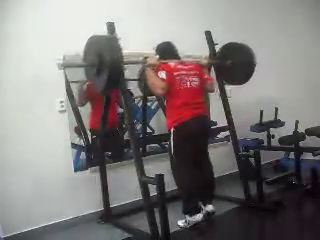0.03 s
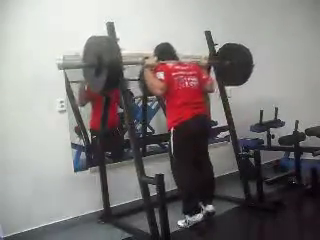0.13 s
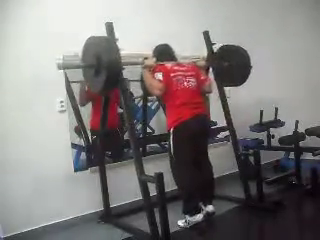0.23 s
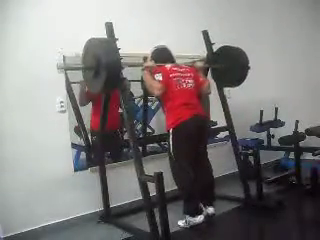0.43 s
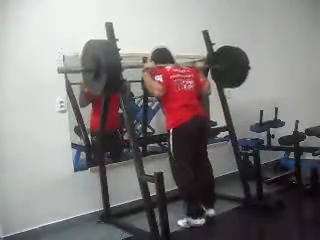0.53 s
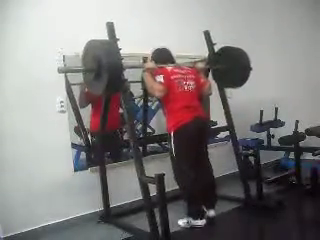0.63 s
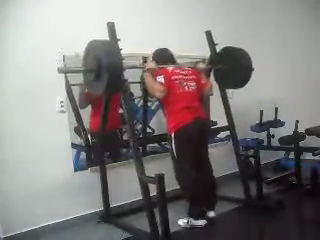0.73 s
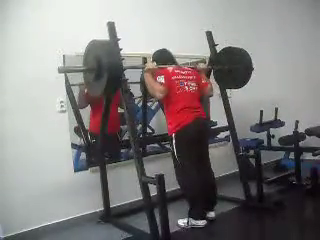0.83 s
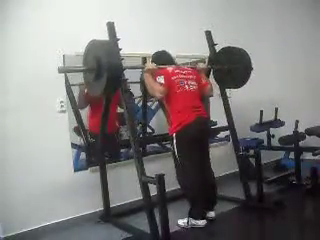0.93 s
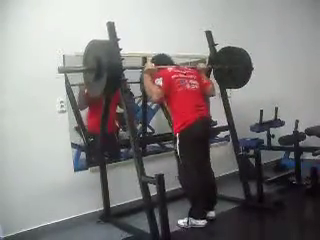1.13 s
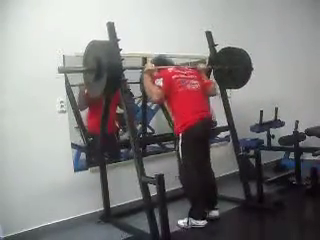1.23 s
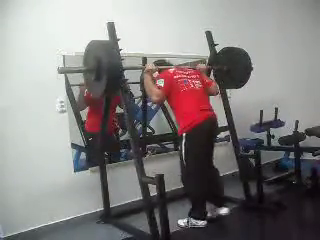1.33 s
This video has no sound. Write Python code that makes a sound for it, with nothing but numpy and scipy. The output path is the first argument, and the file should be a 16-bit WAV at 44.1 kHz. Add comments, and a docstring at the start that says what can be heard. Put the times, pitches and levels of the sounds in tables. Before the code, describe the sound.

A loaded barbell clanks against a steel squat rack several times in quick succession, then rocks to rest in weaker knocks. The plates and uprights ring briefly, picked up with the echo of a small gym.

```python
"""In a small, hard-walled gym, a loaded barbell is set back into a steel squat rack.
The bar brushes and hits one upright, then the other, and rocks to rest in ever weaker knocks.
Each impact excites the normal modes of the steel: crowded modes merge into a dense clash, while
well-separated ones sound as the clear notes of rack, plates and bar, and hooks and sleeve shimmer.
Reverberation smears the knocks over a quiet background of rumble and hiss."""
import sys
import numpy as np
from scipy import signal
from scipy.fft import rfft, irfft
from scipy.io import wavfile
from scipy.ndimage import uniform_filter1d

SR = 44100
rng = np.random.default_rng(int(sys.argv[2]) if len(sys.argv) > 2 else 0)


def wav_out(sig):
    """Save sig, one row per channel (or a flat mono array), as 16-bit PCM at SR to the path in sys.argv[1]."""
    wavfile.write(sys.argv[1], SR, np.round(np.clip(np.atleast_2d(sig).T, -1, 1) * 32767).astype(np.int16))


N = 61739
T = np.arange(N) / SR
FREQS = np.maximum(np.arange(N // 2 + 1) * SR / N, 1)

# Impacts of the bar on the rack. Each row: start in seconds, rise in seconds, then relative levels
# in dB of thud, body, clang, edge, rack notes, plate notes, bar notes, hook ring and sleeve ring.
KNOCKS = [ (.2085, 0.022, -1, -4.5, -2.5, -7, -10, 0.5, -15, 0.5, 2.5),
          (.276, 0.007, -7, -5.5, -18, -13.5, -24, -13.5, -6, -20, -24),
          (.372, 0.015, -0.5, 0.5, -0.5, 3, 2.5, -7.5, -25, 3, -7),
          (.408, .020, -5, -4.5, -3.5, -7.5, 1, -16, 6, -17, -16),
          (.579, 0.032, -4, -5.5, -10.5, -2.5, -5.5, -33, -3.5, 3.5, 1.5),
          (.616, 0.0053, -26, -8.5, -35, -20, -7.5, -35, -26, -1, -20),
          (.767, 0.041, -5, -10.5, -15, -11.5, -12, -8.5, -33, 2.5, -0.5),
          (.866, 0.029, -14, -16, -15.5, -23, -12.5, -13, -14, -24, -35),
          (.950, 0.019, -9.5, -12.5, -20.5, -16, -19, -27, -18.5, -10.5, -13.5),
          (1.055, 0.0067, -16.5, -23.5, -32, -37, -30, -30.5, -50, -20, -16.5),
          (1.165, 0.02, -12, -28, -45, -62, -57, -41, -19, -44, -32),
          (1.199, 0.042, -23, -25.5, -35.5, -32.5, -49, -43, -15.5, -36, -9),
          (1.262, 0.0085, -24, -36, -40.5, -38, -51, -33, -33, -42.5, -15.5), ]
EDGE_DB, RACK_DB, PLATES_DB, BAR_DB, HOOK_DB, SLEEVE_DB = np.array(KNOCKS).T[5:]
# Crowded modes of the steel, with the room's tail. Each row: frequency in Hz, relative spectral
# density in dB, and t60 (the time to decay by 60 dB) in seconds.
CLASH = [(25.1, -5, 1.0), (54.4, -5.5, 0.88), (109, 4.5, 0.14), (163, -7.5, 1), (378, -9.5, 1),
         (537, -6, 0.79), (956, 0.5, 0.64), (1600, -4, 1), (2210, -6, 1), (2685, -4, 0.67),
         (3740, -7, 0.59), (4860, -16, 0.48), (6460, -23.5, 0.58), (7900, -26, 0.54), (10030, -30, 0.31),
         (11150, -49.5, .45), (12500, -59, 0.63)]


def undb(db):
    """Amplitude ratio of a level in decibels."""
    return 10 ** (np.asarray(db) / 20)


def unit(x):
    """Normalisation to an rms of 1."""
    return x / np.sqrt(np.mean(x ** 2))


def along(hz, points_hz, values):
    """Interpolation on a logarithmic frequency axis."""
    return np.interp(np.log(hz), np.log(points_hz), values)


def colour(table):
    """Spectral envelope: a gain at every frequency, from rows of frequency in Hz and level in dB."""
    rows = np.array(table)
    return undb(along(FREQS, rows[:, 0], rows[:, 1]))


def shaped(x, gain):
    """Linear filtering: the spectrum is multiplied by a gain, and the result scaled to an rms of 1."""
    return unit(irfft(rfft(x) * gain, N))


def noise(gain):
    """Filtered white noise takes on the spectral envelope of its filter."""
    return shaped(rng.standard_normal(N), gain)


def resonance(hz, width_hz):
    """Lorentzian curve of a resonance, with its full width at half height."""
    return 1 / (1 + (2 * (FREQS - hz) / width_hz) ** 2)


def ringing(knock_db, t60):
    """Incoherent summation: the energies of the knocks build up, add and decay in one envelope."""
    direct_share, contact_s = 0.29, 0.002  # this share arrives while steel presses into steel
    energy = np.zeros(N)
    for (start, rise, *_), db in zip(KNOCKS, knock_db):
        first = int(start * SR)
        age = T[:N - first]
        direct = direct_share * np.minimum(age / contact_s, 1)
        build = np.minimum(direct + age / rise, 1)
        energy[first:] += (undb(db) * build) ** 2 * np.exp(-2 * np.log(1000) * age / t60)
    return np.sqrt(energy)


def wander(per_s):
    """Moving averages turn white noise into a smooth fluctuation with an rms of 1."""
    span = int(SR / per_s)
    return unit(uniform_filter1d(uniform_filter1d(rng.standard_normal(N), span), span))


def notes(pitches_hz, levels_db, t60s, knock_db):
    """Interference: modes beat against their reflections, modelled as random level and phase drift."""
    waver_db, waver_per_s = 3.5, 26
    out = np.zeros(N)
    for hz, db, t60 in zip(pitches_hz, levels_db, t60s):
        phase = 2 * np.pi * (hz * T + rng.random())
        phase += np.log(undb(waver_db)) * wander(waver_per_s)
        gain = undb(db + waver_db * wander(waver_per_s))
        out += gain * np.sin(phase) * ringing(knock_db, t60)
    return out


def shimmer(centres_hz, clusters, knock_db):
    """Beating: each cluster of close modes shimmers like a narrow band of noise."""
    out = np.zeros(N)
    for hz, (width_hz, db, t60) in zip(centres_hz, clusters):
        out += undb(db) * noise(resonance(hz, width_hz)) * ringing(knock_db, t60)
    return out


def room_tone():
    """Stationary broadband noise forms the quiet rumble and hiss of the gym."""
    # Background spectrum. Each row: frequency in Hz, relative spectral density in dB.
    spectrum = [(15, -39), (25, -1), (65, -1.5), (161, -8), (197, -3), (269, 0.5), (377, -10.5),
                (527, -8.5), (600, -20), (1060, -17.5), (1300, -22), (1480, -27), (2180, -22.5),
                (3380, -29), (7350, -34), (9760, -34.5), (12000, -56), (15600, -77), (22000, -120)]
    return undb(-62) * noise(colour(spectrum))


def slide():
    """Sliding friction: the bar brushes the upright, swelling faintly into the first knock."""
    start_s, centre_hz, half_width_octaves = 0.12, 1210, 0.95
    swell = np.interp(T, [start_s, KNOCKS[0][0], KNOCKS[1][0]], [0, 1, 0])
    band = 1 / (1 + (np.log2(FREQS / centre_hz) / half_width_octaves) ** 4)
    return undb(-61.5) * swell * noise(band)


def chatter():
    """Rebound: steel meets steel again in tiny random contacts just after each knock."""
    contacts_per_s, decay_s = 650, 0.018
    contacts = (rng.random(N) < contacts_per_s / SR) * rng.standard_normal(N)
    ticks = shaped(contacts, colour(CLASH) * FREQS / (FREQS + 1500))
    return undb(-40.5) * ticks * ringing(EDGE_DB, t60=decay_s * np.log(1000))


def sleeve_ring():
    """Closely spaced modes of the bar's sleeve beat in a thin ring."""
    # Centres of the mode clusters in Hz.
    centres_hz = [3930, 6230, 7260, 8880]
    # Each row: cluster width in Hz, relative level in dB, t60 in seconds.
    clusters = [(500, -5, 0.97), (280, -8, 0.64), (181, 1.5, 0.56), (200, -17, 0.32)]
    return shimmer(centres_hz, clusters, SLEEVE_DB - 52)


def hook_ring():
    """Closely spaced modes of the rack's hooks beat in a bright ring."""
    # Centres of the mode clusters in Hz.
    centres_hz = [5050, 5330, 5750, 9100]
    # Each row: cluster width in Hz, relative level in dB, t60 in seconds.
    clusters = [(150, -10.5, 0.88), (170, 1.5, 0.47), (260, 0.5, 0.48), (350, -7.5, 0.24)]
    return shimmer(centres_hz, clusters, HOOK_DB - 52)


def bar_notes():
    """Bending modes of the loaded bar give low, long notes."""
    # The lists give each mode's frequency in Hz, relative level in dB and t60 in seconds.
    pitches_hz = [50, 188, 217, 250]
    levels_db = [-12.5, -2.5, -4.5, -3.5]
    t60s = [6, 1.28, 1.2, 1.37]
    return notes(pitches_hz, levels_db, t60s, BAR_DB - 42.5)


def plate_notes():
    """The weight plates vibrate freely in inharmonic modes after each impact."""
    # The lists give each mode's frequency in Hz, relative level in dB and t60 in seconds.
    pitches_hz = [530, 781, 992, 1250, 1283, 1438, 1510, 1652, 1890, 2073, 2599, 2832, 2940, 3192, 3435]
    levels_db = [-6, -7.5, -1.5, -0.5, -2.5, -5, -11, -3, -6.5, -8.5, -5, -10.5, -10, -13, -8.5]
    t60s = [0.3, 0.79, 0.84, 0.96, 0.29, 0.71, 0.61, 1, 1, 0.99, 0.53, 0.79, 1, 0.63, 0.6]
    return notes(pitches_hz, levels_db, t60s, PLATES_DB - 35)


def rack_notes():
    """The struck uprights ring at their natural frequencies, each with its own damping."""
    # The lists give each mode's frequency in Hz, relative level in dB and t60 in seconds.
    pitches_hz = [624, 719, 858, 884, 924, 1108, 1273, 1482, 1917, 2012, 2462, 2978, 3758, 4177]
    levels_db = [-7.5, -16, -7.5, -2.5, -5, 1, -5, -24, -15.5, -13, -2.5, -10, -7, -8]
    t60s = [.7, 2.54, 1.04, 0.91, 0.61, 0.4, 0.83, 0.3, 0.29, 1.44, 0.17, 0.57, 0.2, 0.17]
    return notes(pitches_hz, levels_db, t60s, RACK_DB - 32)


def crowded_modes():
    """Frequency response of narrow treble resonances of steel, added in power to a diffuse share."""
    count, scatter_db = 520, 3.5
    power = np.zeros(len(FREQS))
    for place, size in zip(rng.random(count), rng.standard_normal(count)):
        hz = 1500 + 9500 * place ** 1.3
        power += undb(scatter_db * size) ** 2 * resonance(hz, width_hz=2.8)
    diffuse = along(FREQS, [1500, 3000], [1, 0.6])
    return np.sqrt(diffuse + (1 - diffuse) * power / uniform_filter1d(power, size=500))


def clash():
    """At high modal density, steel and reverberation merge into noise that decays band by band."""
    # Centres of the thud, body, clang and edge registers in Hz.
    registers_hz = [100, 800, 3300, 4700]
    spectrum = rfft(noise(colour(CLASH) * crowded_modes()))
    hz, _, t60 = np.array(CLASH).T
    out = np.zeros(N)
    for centre in 20 * 2 ** np.arange(0, 10, .5):  # half-octave steps
        triangle = np.maximum(1 - 2 * abs(np.log2(FREQS / centre)), 0)
        knock_db = [along(centre, registers_hz, knock[2:6]) for knock in KNOCKS]
        out += irfft(spectrum * triangle, N) * ringing(knock_db, along(centre, hz, t60))
    return undb(-23.5) * out


def scene():
    """Superposition: the sounds of rack, barbell and room add at one listening point."""
    rings = rack_notes() + plate_notes() + bar_notes() + hook_ring() + sleeve_ring()
    return (clash() + chatter() + rings + slide() + room_tone())[None]


def record(dry):
    """Band limiting: a steep elliptic low-pass filter removes the highest treble."""
    cutoff_hz = 12200
    return signal.sosfilt(signal.ellip(10, .2, 80, cutoff_hz, fs=SR, output="sos"), dry)


dry = scene()
out = record(dry)
wav_out(out)
```